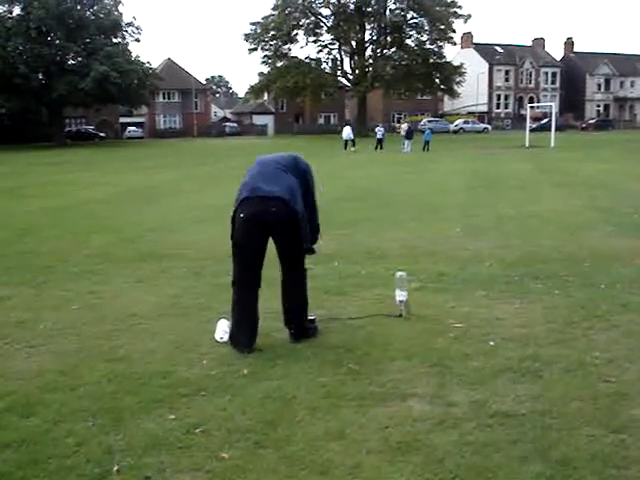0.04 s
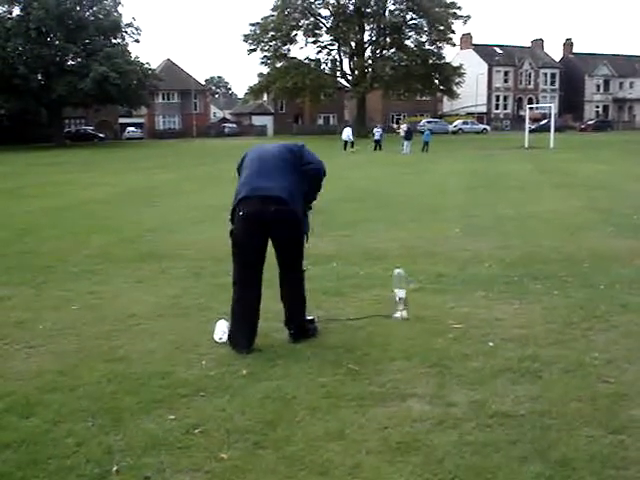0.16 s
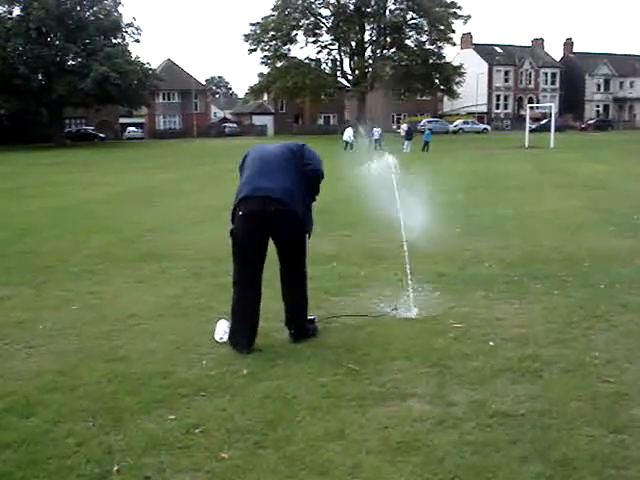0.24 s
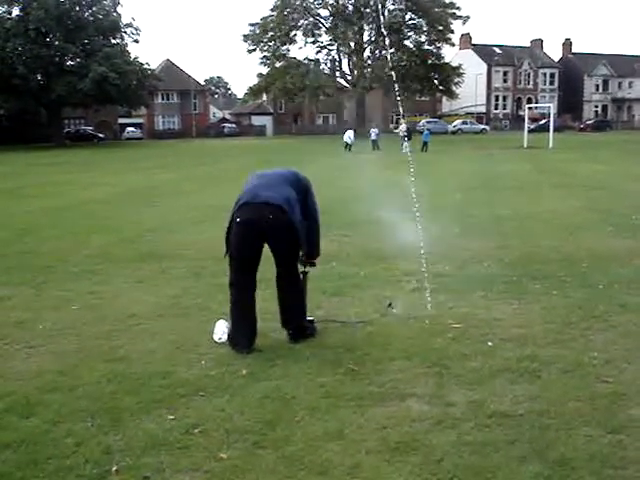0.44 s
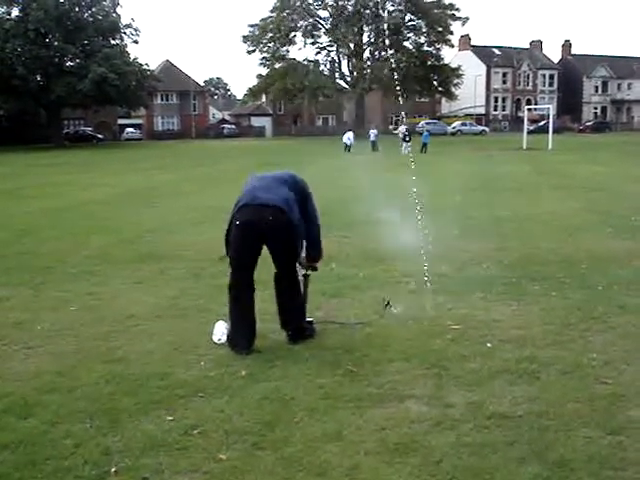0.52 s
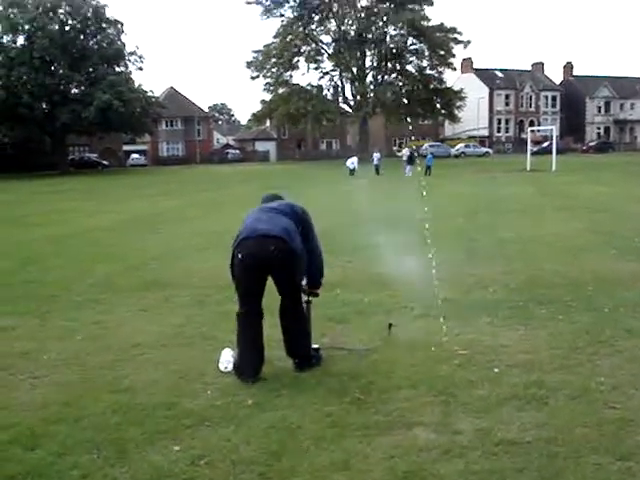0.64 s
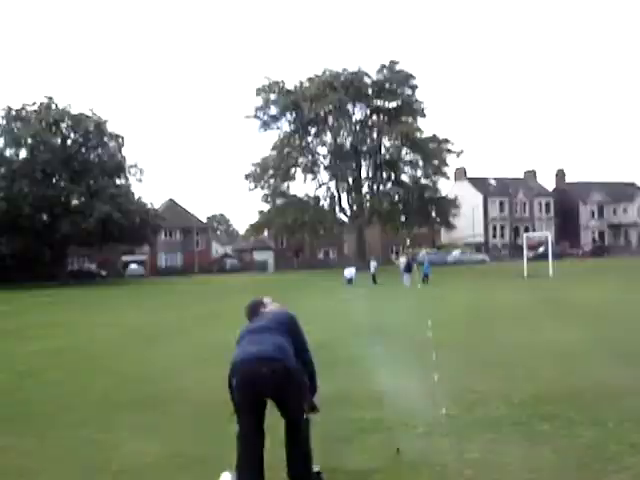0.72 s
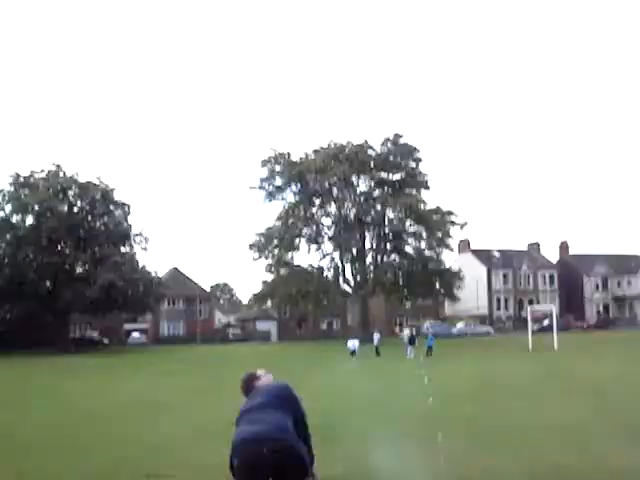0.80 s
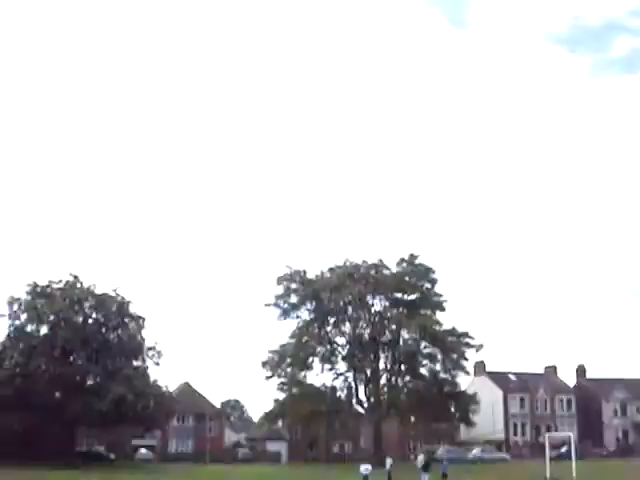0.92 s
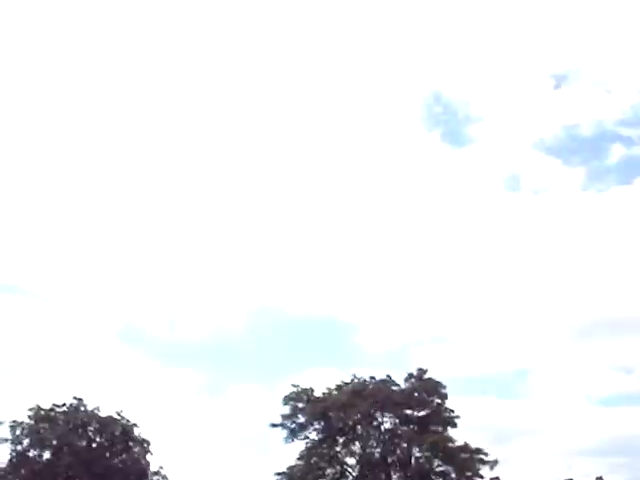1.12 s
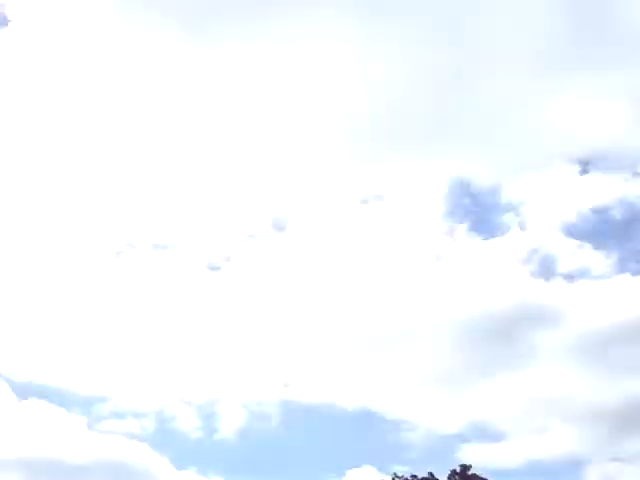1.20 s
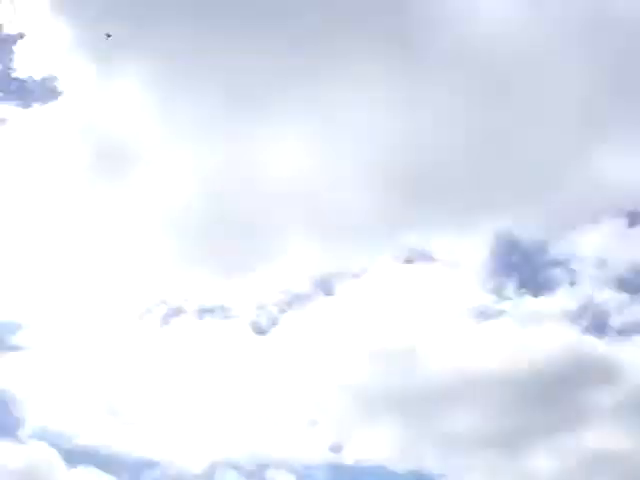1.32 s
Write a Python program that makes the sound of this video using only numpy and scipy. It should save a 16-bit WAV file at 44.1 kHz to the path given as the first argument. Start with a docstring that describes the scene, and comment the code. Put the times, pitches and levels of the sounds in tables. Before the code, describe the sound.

A bottle rocket filled with water pops and blasts off a park lawn in one short, wet burst. Drops patter and slap down as a soft whoosh and whistle trail off over a breeze and a distant rumble.

```python
"""A pop, a wet squirt and a sharp burst of air: a water rocket leaves a park lawn.
The plug lets go, water tears through the bottle's neck, the air follows and the neck gulps.
Spray hisses down on the grass and two lumps of water slap the ground. Air blowing over the bottle's
mouth makes a breathy whistle that fades as it flies off. Light wind and a distant rumble lie beneath."""
import sys
import numpy as np
from scipy import signal
from scipy.fft import rfft, irfft, next_fast_len
from scipy.io import wavfile
from scipy.ndimage import uniform_filter1d, map_coordinates

SR = 44100
rng = np.random.default_rng(int(sys.argv[2]) if len(sys.argv) > 2 else 0)


def wav_record(signal):
    """Record a signal, one row per channel, as 16-bit PCM in the file named by sys.argv[1]."""
    frames = np.transpose(np.atleast_2d(signal))
    bounded = np.clip(frames, -1, 1)
    # unit amplitude maps onto the largest positive 16-bit level
    quanta = np.round(bounded * 32767).astype(np.int16)
    wavfile.write(sys.argv[1], SR, quanta)


N = 59535
T = np.arange(N) / SR

# tone of water breaking into drops: pitch_hz, level_db
FIZZ_TONE = [(300, -14), (1300, -5), (3000, -1), (4500, -1), (6000, -1), (7600, 0), (8600, -3), (9100, -8),
             (10000, -13)]


def air_burst():
    """Escaping air barks through the bottle, then turns to fizz while the neck rings."""
    # pitches the emptying bottle rings at: pitch_hz, width_hz, level_db
    bottle = [(380, 170, -4), (810, 130, 0), (1420, 200, -2), (1890, 150, 1), (2190, 170, 1),
              (2400, 80, -4), (2830, 200, -8), (3190, 170, -6.5), (4300, 500, -14), (5400, 600, -21)]
    # how each part swells and fades: start_s, rise_s, hold_s, fade_s, level_db
    bark_shape = (.287, .0016, .0052, .034, -12)
    fizz_shape = (.2905, .006, .003, .015, -18.8)
    ring_shape = (.287, .005, .009, .014, -18.5)
    bark = steady(resonant(white(), bottle), size=130) * envelope(*bark_shape)
    fizz = steady(coloured(droplets(3000, .4), FIZZ_TONE)) * envelope(*fizz_shape)
    return bark + fizz + neck_tone() * envelope(*ring_shape)


def water_jet():
    """The seal leaks, then water tears through the neck and breaks into drops."""
    # pitches the jet rings at: pitch_hz, width_hz, level_db
    peaks = [(450, 300, -9), (880, 300, -6), (1330, 220, 1.5), (2150, 400, -8), (2750, 500, -7),
             (4100, 700, -13)]
    # how each part swells and fades: start_s, rise_s, hold_s, fade_s, level_db
    leak_shape = (.231, .003, .01, .05, -41)
    jet_shape = (.241, .003, .016, .095, -28.7)
    fizz_shape = (.252, .0015, .009, .06, -31.5)
    ring_shape = (.2405, .002, .014, .1, -31.5)
    jet = envelope(*jet_shape)
    body = steady(resonant(droplets(1500, .6), peaks)) * (envelope(*leak_shape) + jet)
    fizz = coloured(patchy(droplets(1500, .6), depth_db=3), FIZZ_TONE)
    fizz *= envelope(*fizz_shape) + amp(-9) * jet
    return body + fizz + neck_tone() * envelope(*ring_shape)


def neck_tone(pitch_hz=1340, waver=.04):
    """The flow through the neck sings a wavering note."""
    hz = pitch_hz * (1 + waver * wobble(300))
    return np.sqrt(2) * np.sin(2 * np.pi * np.cumsum(hz) / SR)


def pops_and_gulps():
    """The plug pops, the air thumps and the emptied bottle gulps."""
    # short tones at the neck, each played 3 dB softer: start_s, pitch_hz, level_db, rise_s, fade_s
    knocks = [(.2458, 310, -19, .002, .03), (.246, 460, -15, .0016, .024), (.2872, 75, -24, .001, .035),
              (.2878, 340, -23, .002, .065), (.308, 320, -24, .002, .025), (.3105, 80, -27, .001, .035),
              (.3108, 830, -14, .001, .013), (.317, 610, -28, .002, .045), (.326, 750, -27, .005, .06)]
    return sum(ping(start, hz, rise, fade, db - 3) for start, hz, db, rise, fade in knocks)


def slaps():
    """Lumps of water hit the ground with a short splat and a soft thud."""
    # landings: start_s, level_db
    hits = [(.5669, -16.5), (.5883, -19.5)]
    # tone of a splat: pitch_hz, level_db
    tone = [(30, -6), (200, -3), (800, -5), (1300, 1), (1900, -4), (2500, -1), (4000, 0), (7000, -4),
            (10000, -10)]
    splats = sum(steady(coloured(white(), tone), size=40) * envelope(start, .0002, 0, .015, db)
                 for start, db in hits)
    thuds = sum(ping(start, hz=70, rise_s=.001, fade_s=.035, db=db - 19) for start, db in hits)
    return splats + thuds


def spray():
    """Drops settle unevenly on the grass, the fine mist last and highest; one stray drop follows."""
    # loudness of the landing drops: time_s, level_db
    levels = [(.225, -90), (.235, -54), (.315, -45), (.36, -50), (.42, -49), (.448, -34), (.475, -30.3),
              (.52, -31), (.558, -29.5), (.58, -36), (.6, -34), (.67, -44), (.74, -57), (1.0, -67),
              (1.35, -72)]
    # tone of the drops and the mist: pitch_hz, level_db
    drop_tone = [(200, -25), (1000, -13), (2200, -7.5), (3200, -9.5), (3950, -1), (4350, -6), (4900, -1.5),
                 (5850, -7), (6300, .5), (6700, -3), (7300, 2), (7900, -5), (8400, -3.5), (9000, -8),
                 (10000, -9)]
    mist_tone = [(5000, -32), (7600, -12), (8400, 0), (9200, -3), (10000, -3.5)]
    # the mist and the stray drop landing: start_s, rise_s, hold_s, fade_s, level_db
    mist_shape = (.495, .045, .045, .44, -36.5)
    stray_shape = (1.079, .002, .002, .025, -50)
    level_db, = curves(levels)
    gain = amp(level_db + .8 * wobble(110))
    drops = coloured(patchy(droplets(4000, .4), depth_db=3), drop_tone)
    mist = coloured(patchy(droplets(2000, .4), depth_db=3), mist_tone)
    return gain * drops + mist * (envelope(*mist_shape) + envelope(*stray_shape))


def whistle(spread_hz=95):
    """Air blows a breathy note on the mouth of the flying bottle."""
    # path of the note: time_s, pitch_hz, level_db
    path = [(.4, 1300, -65), (.5, 1400, -48.5), (.58, 1420, -47), (.655, 1740, -46.5), (.71, 1630, -44.5),
            (.78, 1600, -44.5), (.87, 1540, -47.5), (1.0, 1510, -50.5), (1.35, 1490, -57)]
    hz, level_db = curves(path)
    phase = 2 * np.pi * np.cumsum(hz) / SR
    flutter = lambda: filtered(white(), lambda f: 1 / (1 + (f / spread_hz) ** 2))
    return amp(level_db) * unit(flutter() * np.cos(phase) + flutter() * np.sin(phase))


def air_rush():
    """Air and mist rush behind the rocket as it flies away."""
    # loudness of the rush: time_s, level_db
    levels = [(.235, -80), (.315, -42.5), (.38, -45), (.47, -42.5), (.6, -41), (.74, -41.7), (.9, -43),
              (1.05, -47.7), (1.2, -50.5), (1.35, -52.5)]
    # its tone: pitch_hz, level_db
    tone = [(100, -26), (210, -9), (285, 7), (370, -2), (550, 0), (1000, -1), (1400, 1), (2000, -1.5),
            (2700, -1), (4000, -3.5), (5500, -12), (7300, -11), (10000, -27)]
    level_db, = curves(levels)
    return amp(level_db) * coloured(patchy(white(), depth_db=1.5), tone)


def rumble():
    """A low, distant rumble swells and sinks."""
    # the swells: time_s, level_db
    levels = [(0, -44.5), (.11, -42), (.2, -45), (.38, -47), (.47, -43.5), (.58, -46), (.67, -41.5),
              (.74, -45), (.92, -47), (1.07, -48.5), (1.14, -43.5), (1.23, -48), (1.35, -50)]
    # tone of the rumble: pitch_hz, level_db
    tone = [(25, -30), (60, -21), (100, -13), (150, 0), (190, -1), (230, -11), (285, -3), (370, -17),
            (700, -28), (2000, -60)]
    level_db, = curves(levels)
    return amp(level_db) * steady(coloured(white(), tone), size=2600)


def breeze():
    """Light wind stirs the trees."""
    # loudness of the wind: time_s, level_db
    levels = [(0, -48.5), (.04, -46), (.1, -49), (.2, -50), (1.35, -50.5)]
    # its tone: pitch_hz, level_db
    tone = [(30, -12), (100, -6), (500, 1.5), (1100, 0), (1900, -6.5), (4000, -9.5), (6000, -16),
            (8000, -20), (10000, -24.5)]
    level_db, = curves(levels)
    return amp(level_db + .5 * wobble(12)) * coloured(patchy(white(), depth_db=1.5), tone)


def amp(db):
    """Turn decibels into a multiplier."""
    return 10 ** (np.asarray(db) / 20)


def unit(x):
    """Scale to an average power of 1."""
    return x / np.sqrt(np.mean(x ** 2) + 1e-20)


def curves(rows):
    """Join timed points with lines, one curve for each column after the time."""
    times, *columns = np.transpose(rows)
    return [np.interp(T, times, column) for column in columns]


def envelope(start_s, rise_s, hold_s, fade_s, db):
    """Rise, hold, then drop 60 dB every fade_s."""
    age = T - start_s
    fade = amp(-60 * np.maximum(age - rise_s - hold_s, 0) / fade_s)
    return amp(db) * np.clip(age / rise_s, 0, 1) * fade


def ping(start_s, hz, rise_s, fade_s, db):
    """A pure tone that dies away."""
    return np.sin(2 * np.pi * hz * (T - start_s)) * envelope(start_s, rise_s, 0, fade_s, db)


def filtered(x, response):
    """Turn each pitch up or down by response(hz)."""
    size = next_fast_len(N + 8192)
    return irfft(rfft(x, size) * response(np.fft.rfftfreq(size, 1 / SR)), size)[:N]


def coloured(x, tone):
    """Shape a noise with a tone table."""
    pitches, db = np.transpose(tone)
    return unit(filtered(x, lambda hz: amp(np.interp(np.log(hz + 1), np.log(pitches), db))))


def resonant(x, peaks):
    """Make a noise ring at the listed pitches."""
    def response(f):
        return sum((-1) ** k * amp(db) * 1j * f * width / (hz * hz - f * f + 1j * f * width)
                   for k, (hz, width, db) in enumerate(peaks))
    return unit(filtered(x, response))


def white():
    """Fresh, even hiss."""
    return rng.standard_normal(N)


def wobble(per_s):
    """A smooth curve through per_s random points a second."""
    return map_coordinates(rng.standard_normal(N // 4), [T * per_s + 2], mode="wrap")


def droplets(per_s, share):
    """Tiny random impacts mixed with hiss; share is their part of the power."""
    hits = (rng.random(N) < per_s / SR) * white()
    return np.sqrt(share) * unit(hits) + np.sqrt(1 - share) * white()


def steady(x, size=260):
    """Even out loudness over size samples, like a flow under constant pressure."""
    return x / np.sqrt(np.abs(uniform_filter1d(x * x, size)) + 1e-6)


def patchy(x, depth_db):
    """Give a noise random loud and soft patches in time and pitch."""
    spectrum = signal.stft(x, nperseg=256)[2]
    patches = uniform_filter1d(rng.standard_normal(spectrum.shape), size=3, axis=0)
    patches = uniform_filter1d(patches, size=14, axis=1)
    return signal.istft(spectrum * amp(depth_db * unit(patches)), nperseg=256)[1][:N]


def scene():
    """The launch in the open air."""
    launch = water_jet() + air_burst() + pops_and_gulps()
    return (launch + spray() + slaps() + whistle() + air_rush() + rumble() + breeze())[None]


def record(dry):
    """Round off the loudest peaks and cut the highest treble steeply."""
    ceiling, top_hz = .8, 10050
    rounded = dry[0] / (1 + np.abs(dry[0] / ceiling) ** 4) ** (1 / 4)
    return filtered(rounded, lambda hz: np.clip((top_hz - hz) / 200 + .5, 0, 1))[None]


dry = scene()
out = record(dry)
wav_record(out)
```